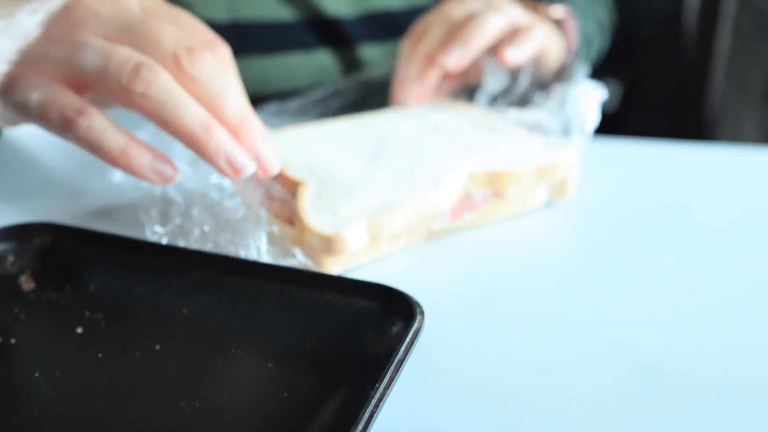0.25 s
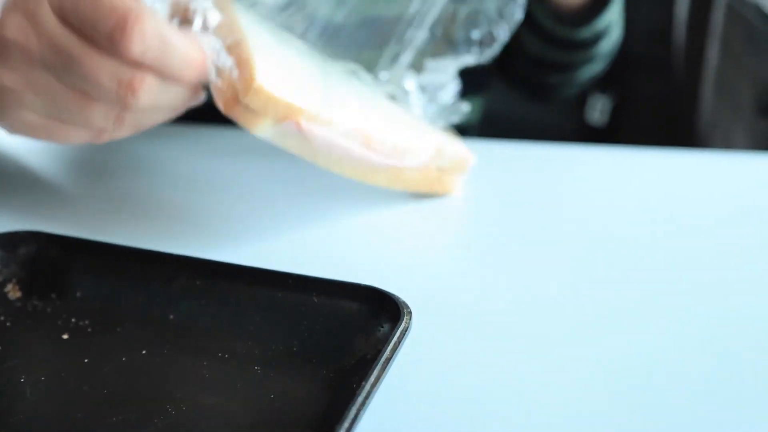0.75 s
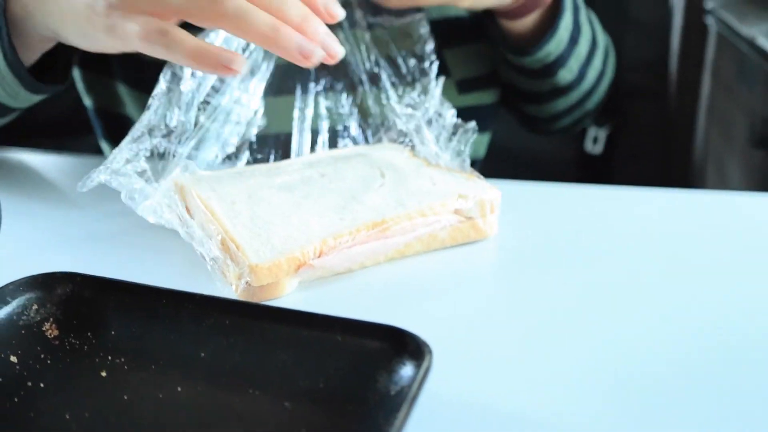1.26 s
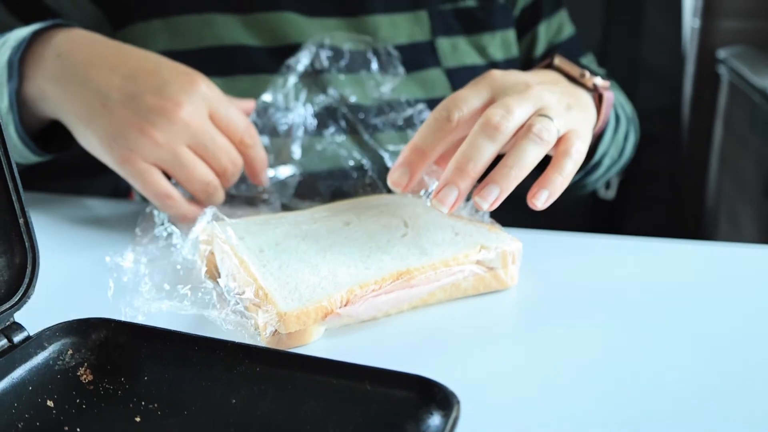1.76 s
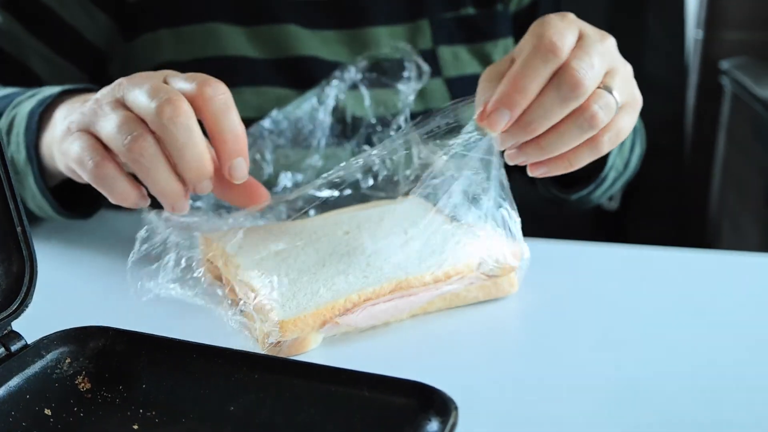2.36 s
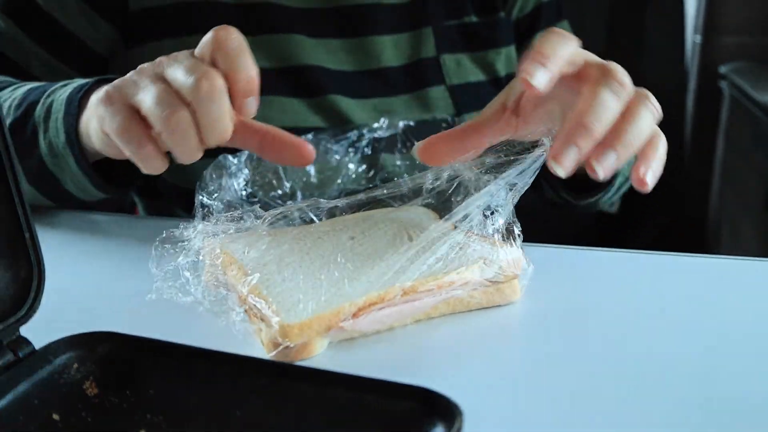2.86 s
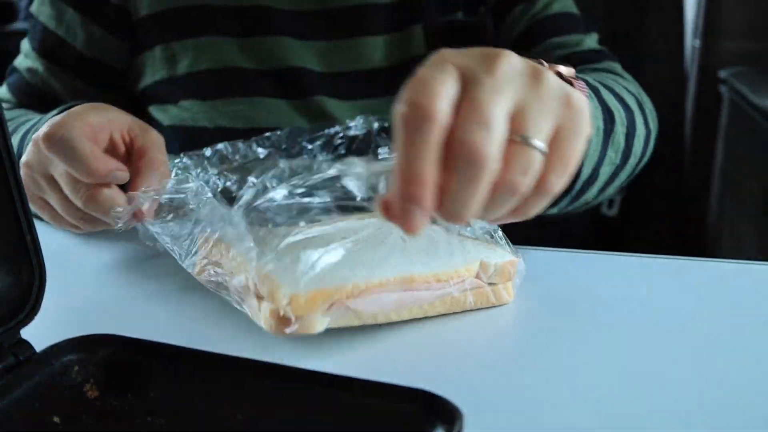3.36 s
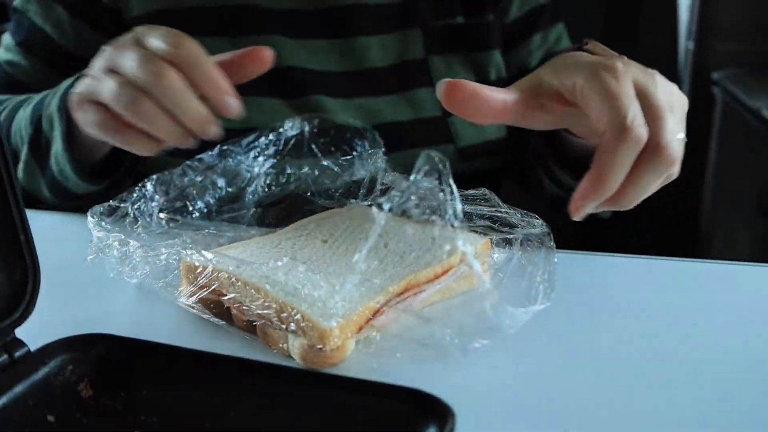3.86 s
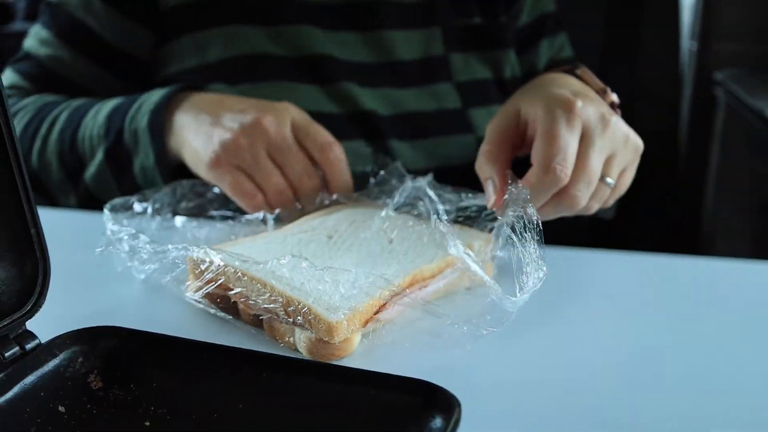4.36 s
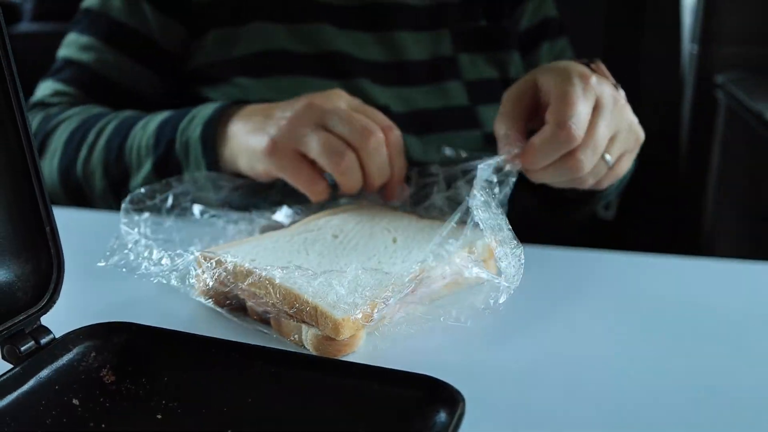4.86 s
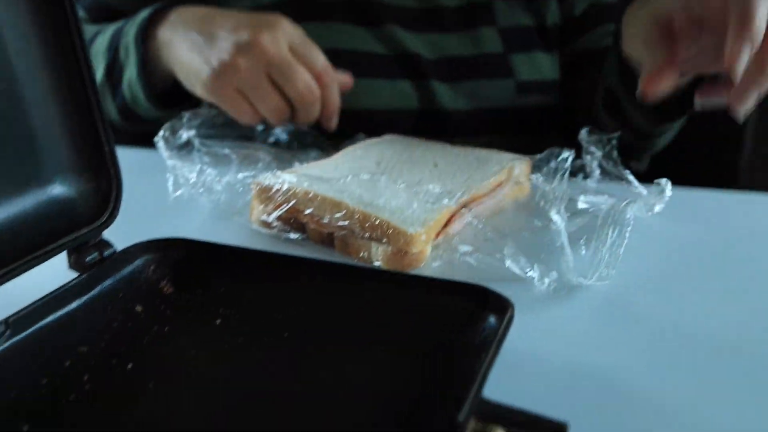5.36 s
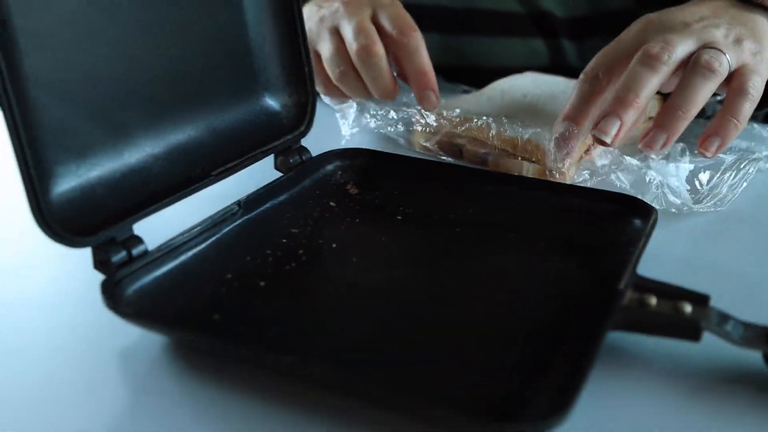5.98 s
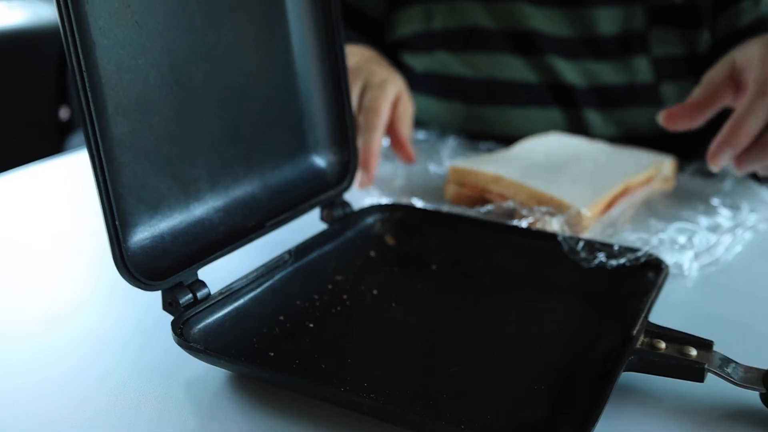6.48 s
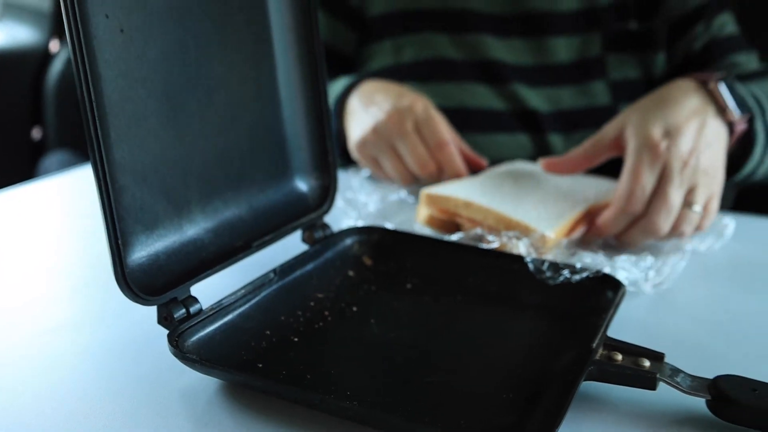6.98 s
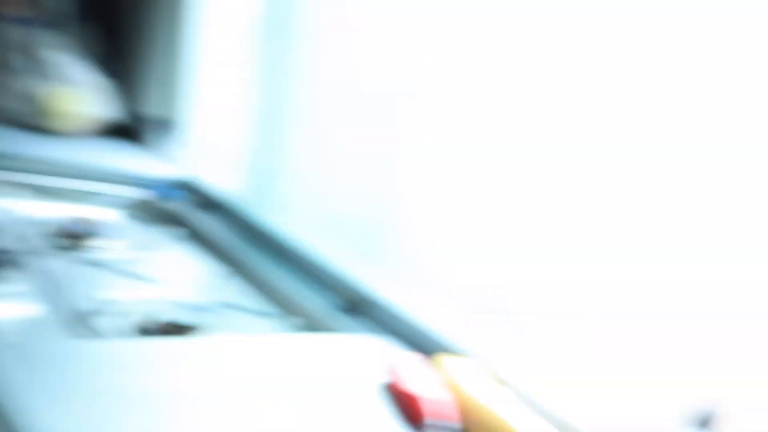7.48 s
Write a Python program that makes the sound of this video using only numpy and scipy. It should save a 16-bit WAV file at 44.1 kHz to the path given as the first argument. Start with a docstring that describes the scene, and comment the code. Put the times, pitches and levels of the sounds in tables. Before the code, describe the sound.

Over the soft, steady whir of an appliance in a small kitchen, plastic wrap rustles and pops close by as someone unwraps a sandwich. A loud knock on the table and a soft slap come first, then fitful crinkling builds to a sharp snap. Near the end a sandwich toaster takes a clunk and scrapes briefly, followed by a bump on the microphone, low handling rumble and a small clink.

```python
"""Unwrapping a sandwich

Cling film peels off a sandwich on a kitchen table, close to a hand-held camera in a small room.
It slips in tiny stick-slip bursts, creases buckle and pop, and a stretched corner snaps free.
Hands knock the table and nudge a sandwich toaster, which rings in its damped modes and skids.
An appliance whirs behind; at the end the camera is picked up and swung away."""
import sys
import numpy as np
from scipy import signal
from scipy.fft import rfft, irfft
from scipy.io import wavfile

SR = 44100
rng = np.random.default_rng(int(sys.argv[2]) if len(sys.argv) > 2 else 0)


def wav_record(signal):
    """Record a signal, one row per channel, as 16-bit PCM in the file named by sys.argv[1]."""
    frames = np.transpose(np.atleast_2d(signal))
    bounded = np.clip(frames, -1, 1)
    # unit amplitude maps onto the largest positive 16-bit level
    quanta = np.round(bounded * 32767).astype(np.int16)
    wavfile.write(sys.argv[1], SR, quanta)


N = 340628
T = np.arange(N) / SR
RING_T = T[:SR // 3]


def amp(db):
    """Amplitude ratio: tenfold for every 20 dB."""
    return 10 ** (np.asarray(db) / 20)


def unit(x):
    """Normalisation to rms 1."""
    return x / np.sqrt(np.mean(x ** 2))


def peaked(x, db):
    """Normalisation to a given peak level."""
    return x * amp(db) / np.abs(x).max()


def curve(rows, column):
    """Linear interpolation of one column over time."""
    rows = np.array(rows)
    return np.interp(T, rows[:, 0], rows[:, column])


def during(rows):
    """A rectangular gate, open from the first row to the last."""
    return (T >= rows[0][0]) & (T <= rows[-1][0])


def add(track, start_s, sound):
    """Superposition: a sound adds to the track from its start time."""
    start = int(start_s * SR)
    track[start:start + len(sound)] += sound[:N - start]


def response(spectrum, size=16384):
    """Minimum-phase impulse response of a (Hz, dB) spectrum, by folding the cepstrum."""
    hz, db = np.transpose(spectrum)
    bins_hz = np.maximum(np.arange(size // 2 + 1) * SR / size, 1)
    magnitude = amp(np.interp(np.log(bins_hz), np.log(hz), db))
    cepstrum = irfft(np.log(magnitude))
    cepstrum[1:size // 2] *= 2
    cepstrum[size // 2 + 1:] = 0
    return irfft(np.exp(rfft(cepstrum)))


def through(x, impulse):
    """Convolution with a response of unit energy."""
    return signal.fftconvolve(x, impulse / np.linalg.norm(impulse))[:N]


def band(x, hz, width_hz):
    """A second-order resonance, gain 1 at its centre."""
    hz = min(hz, SR / 3)
    quality = hz / min(width_hz, SR / 3)
    return signal.lfilter(*signal.iirpeak(hz, quality, fs=SR), x)


def soften(x, hz):
    """A first-order low-pass dulls the treble."""
    pole = np.exp(-2 * np.pi * hz / SR)
    return signal.lfilter([1 - pole], [1, -pole], x)


def walk(rate):
    """Random modulation of rms 1, with about rate turns a second."""
    return unit(np.interp(T * rate, np.arange(N // 4), rng.standard_normal(N // 4)))


def gesture(start, length, attack_s, release_db_per_s):
    """Envelope of a hand movement: linear attack, hold, exponential release."""
    attack = np.clip((T - start) / attack_s, 0, 1)
    return attack * amp(-release_db_per_s * np.maximum(T - start - length, 0))


# Spectrum of the moving air. Each row: frequency in Hz, relative level in dB.
AIR_SPECTRUM = [(30, -7.5), (80, 3), (160, 2), (280, -5.5), (700, -4.5), (1050, -6.5), (1500, -6.5),
                (2200, -12), (3000, -17), (5000, -20), (9000, -23), (15500, -29.5)]
# Its resonances. Each row: centre in Hz, nominal width in Hz, rms level in dB.
WHISTLES = [(1180, 33, -66), (1735, 157, -46.5), (3900, 220, -62.5), (9500, 300, -67)]


def appliance(air_db=-44):
    """Steady airflow makes broadband noise; resonances pick out narrow whistling bands."""
    air = through(rng.standard_normal(N), response(AIR_SPECTRUM)) * amp(air_db + .5 * walk(5))
    for hz, width_hz, db in WHISTLES:
        whistle = rng.standard_normal(N)
        for _ in range(2):
            whistle = band(whistle, hz, width_hz * 2.2)
        air += unit(whistle) * amp(db + 0.22 * walk(8.4))
    return air


# Spectrum of the camera's rumble. Each row: frequency in Hz, relative level in dB.
RUMBLE_SPECTRUM = [(8, -9.5), (16, 2), (30, -15.5), (60, -14.5), (120, -29), (300, -32.5), (1000, -84)]
# Moves of the camera. Each row: start in seconds, length in seconds, level in dB.
MOVES = [(0.287, 0.59, -33.5), (5.097, 0.25, -36.5), (5.655, 0.26, -39.5), (7.136, 0.11, -27),
         (7.431, 0.083, -29.5), (7.674, 0.07, -23.5)]


def handling(held_db=-45.5, sway_db=1.5):
    """Structure-borne noise: the camera rumbles faintly in the hand, and more with each move."""
    gain = amp(held_db + sway_db * walk(3.07))
    for start, length, db in MOVES:
        move = amp(db) * gesture(start, length, attack_s=0.028, release_db_per_s=57)
        gain = np.maximum(gain, move)
    return through(rng.standard_normal(N), response(RUMBLE_SPECTRUM)) * gain


# Rustles: the film as it is pulled and, in the last row, faint handling as the camera is swung away.
# Each row: start in seconds, length in seconds, final level in dB, growth in dB.
RUSTLES = [(0, 0.067, -47, -1.5), (0.204, 0.22, -42, 7), (0.364, 0.075, -33.5, 6.5),
           (0.477, 0.061, -42.5, -4), (0.554, 0.26, -32.5, 0.5), (0.833, .11, -35, 1), (1, .1, -34.5, 5.5),
           (1.149, .23, -39, 1.5), (1.44, 0.3, -45.5, -0.5), (1.692, 0.15, -46.5, -6),
           (1.933, 0.068, -50.5, -2), (2.054, 0.02, -44.5, -7), (2.105, 0.072, -36, 12),
           (2.188, 0.26, -39, -5), (2.414, 0.026, -33, 1), (2.47, 0.16, -45.5, -4.5),
           (2.591, 0.072, -40.5, 1.5), (2.69, 0.096, -49, 2), (3.095, 0.24, -31, 20),
           (3.343, 0.13, -36.5, 2), (3.43, .12, -34, 0.5), (3.618, 0.049, -40, 0), (4.018, 0.2, -49.5, 0.5),
           (4.257, .16, -47, 5), (4.447, 0.37, -52, -1), (4.723, 0.091, -35.5, 14.5),
           (4.834, 0.3, -32.5, 3.5), (5.187, 0.11, -44.5, -2.5), (5.84, .45, -41.5, 7),
           (6.299, 0.062, -36.5, 2), (6.734, 0.19, -53.5, -6), (6.956, 0.11, -50, -1.5),
           (7.195, 0.23, -46, 8), (7.48, 0.25, -47, 6.5)]


def pull(grab_s=0.0069, creep_db=-7.5):
    """Loading and relaxation: the level in dB ramps along each rustle, drops, then creeps away."""
    gain = np.full(N, 1e-4)
    for start, length, end_db, growth_db in RUSTLES:
        to_go = np.clip(1 - (T - start) / length, 0, 1)
        held = gesture(start, length, grab_s, release_db_per_s=188)
        creep = amp(creep_db) * gesture(start, length, grab_s, release_db_per_s=69.5)
        envelope = amp(end_db - growth_db * to_go) * np.maximum(held, creep)
        gain = np.maximum(gain, envelope)
    return 20 * np.log10(gain)


def slips(rate, spread_db):
    """A Poisson process: about rate impulses a second, of unequal size, rms 1."""
    size = amp(spread_db * np.clip(rng.standard_normal(N), -2, 2))
    occurs = rng.random(N) < rate / SR
    return unit(occurs * rng.choice([-1, 1], N) * size)


def crackles(rate, spread_db, t60):
    """Crackling noise: each buckling fold starts an avalanche of slips that decays exponentially."""
    retained = np.exp(-np.log(1e6) / (t60 * SR))
    energy = signal.lfilter([1], [1, -retained], slips(rate, spread_db) ** 2 + 1e-12)
    return unit(np.sqrt(energy) * rng.standard_normal(N))


# Spectra of the slips and of the taut sheet they shake. Each row: frequency in Hz, relative level in dB.
SLIP_SPECTRUM = [(300, -7.5), (1200, -1.5), (2500, 1), (4500, -0.5), (6500, -1.5), (9000, -1),
                 (12000, -5.5), (15500, -12.5)]
SHEET_SPECTRUM = [(80, -2.5), (160, 1.5), (260, -5.5), (500, 0.5), (900, -0.5), (1300, -5.5), (1700, -3),
                  (3000, -10), (8000, -36)]


def film(pull_db, slack_below_db=-42, slack_span_db=18):
    """Stick-slip peeling: the front catches and runs in spurts, slips fuse into hiss, folds tick."""
    # slack film stirs in fits, ticks more and sounds thinner
    slack = np.clip((slack_below_db - pull_db) / slack_span_db, 0, 1)
    spurts = amp(0.72 * walk(70) + (0.83 + 0.85 * slack) * walk(30))
    hiss = crackles(rate=2500, spread_db=-1, t60=0.016) * spurts
    # facets of different sizes tick at different pitches
    facets = sum(band(crackles(rate=45, spread_db=6, t60=0.006), hz, hz * 0.49)
                 for hz in (2200, 3980, 6540, 11200))
    ticks = amp(-11 + 0.5 * slack) * unit(facets) * spurts
    fine_slips = band(crackles(rate=900, spread_db=-3, t60=0.0047), hz=9300, width_hz=7000)
    thin_hiss = amp(-9.5) * slack * fine_slips * spurts
    rustle = through(hiss + thin_hiss + ticks, response(SLIP_SPECTRUM))
    # the harder the pull, the more the sheet sounds like a drumskin
    sheet = through(hiss, response(SHEET_SPECTRUM)) * amp(-6.0 + 0.052 * (pull_db + 29))
    return (amp(1.66) * rustle + sheet) * amp(pull_db)


def ring(modes):
    """Free vibration in damped modes; a panel radiates little below its lowest mode."""
    motion = sum(amp(db - 60 * RING_T / t60) * np.sin(2 * np.pi * hz * RING_T) for hz, db, t60 in modes)
    radiation = signal.butter(4, .85 * modes[0][0], "high", fs=SR, output="sos")
    return signal.sosfilt(radiation, motion)


def crack(spectrum, t60, scatter):
    """Source and filter: an impulse and a scatter of smaller ones take on the object's spectrum."""
    burst = scatter * rng.standard_normal(len(RING_T)) * amp(-60 * RING_T / t60)
    burst[0] += 1
    # bending waves disperse: the lows arrive just after the highs
    burst = signal.lfilter([-.5, 1], [1, -.5], burst)
    return signal.fftconvolve(burst, response(spectrum))[:len(RING_T)]


# Spectrum of a contact click. Each row: frequency in Hz, relative level in dB.
CLICK_SPECTRUM = [(200, -1.5), (600, 2.5), (1300, 6), (2000, -1), (2600, -1.5), (3500, -4), (4600, -1),
                  (6500, -6), (9000, -13.5), (15000, -23)]


def blows(events, modes):
    """Impact excitation: each blow clicks at the contact and sets the struck body ringing."""
    out = np.zeros(N)
    for start, ring_db, click_db in events:
        add(out, start, peaked(ring(modes), ring_db))
        click = crack(CLICK_SPECTRUM, t60=0.053, scatter=0.14)
        add(out, start, -peaked(click, click_db))
    return out


# Blows on the table; the row at 5.274 s is the sandwich settling onto it. Each row: start in seconds, ring peak
# in dB, click peak in dB.
TABLE_KNOCKS = [(.2992, 0.5, -7), (.3083, -30, -14), (5.274, -24.5, -44), (6.8758, -20.5, -20),
                (7.700, -31, -37)]
# Modes of the table. Each row: frequency in Hz, relative level in dB, 60 dB decay time in seconds.
TABLE_MODES = [(95, -12, 0.12), (170, -19, .08), (219, 0, 0.1), (329, -5, 0.13), (446, 6.5, 0.034),
               (644, -10, 0.076), (740, 10, 0.023), (930, -5, 0.07), (1050, -4, 0.085), (1546, -16, 0.14),
               (1713, -12, 0.082), (2276, -5, 0.026)]


def knocks():
    """A struck plate: the table rings in its modes when a hand knocks it or the sandwich settles on it."""
    return blows(TABLE_KNOCKS, TABLE_MODES)


# The main creases. Each row: start in seconds, nominal level in dB, centre frequency in Hz.
MAIN_CREASES = [(0.373, -20, 5760), (.4095, -12, 4260), (.4544, -25, 6530), (0.5692, -14.5, 9130),
                (.632, -10.5, 8950), (1.2077, -18.5, 8160), (1.3361, -18, 4220), (1.703, -21, 5000),
                (2.073, -21, 4180), (2.425, -20, 5500), (2.593, -20, 5120), (3.2042, -20, 3740),
                (3.2979, -17, 5560), (3.4417, -17, 7650), (4.885, -13, 4680), (4.9757, -16, 5660),
                (5.8426, -27, 9500), (7.4016, -24, 7530)]


def creases(pull_db, pops_per_s=9, over_pull_db=12, spread_db=4, centre_hz=5500):
    """Buckling: a crease gives way in a brief dense burst; the louder it is, the longer it lasts."""
    out = np.zeros(N)
    # lesser creases pop by chance, at levels that follow the pull
    moments = np.flatnonzero(rng.random(N) < pops_per_s / SR)
    chance = np.clip(rng.standard_normal((len(moments), 2)), -2, 2)
    lesser = [(T[i], pull_db[i] + over_pull_db + spread_db * size, centre_hz * 2 ** octaves)
              for i, (size, octaves) in zip(moments, chance)]
    for start, db, hz in MAIN_CREASES + lesser:
        pop = crack(SLIP_SPECTRUM, t60=0.02 * amp(0.16 * (db + 23)), scatter=0.24)
        add(out, start + .001, peaked(band(pop, hz, hz * 0.74), db - 3))
    return out


# The sandwich lands. Each row: start in seconds, ring peak in dB, click peak in dB.
SANDWICH_FLOPS = [(.785, -23, -18), (.7925, -9, -18), (.803, -32, -36)]
# Modes of the slap. Each row: frequency in Hz, relative level in dB, 60 dB decay time in seconds.
SLAP_MODES = [(98.5, 5.5, 0.038), (175, -0.5, 0.043), (620, 2, 0.049), (660, -1, 0.024), (885, -3, 0.031)]


def flop():
    """A soft impact: the sandwich slaps the table, exciting low, heavily damped modes."""
    return blows(SANDWICH_FLOPS, SLAP_MODES)


# Course of the squeak. Each row: time in seconds, pitch in Hz, level in dB.
SQUEAK_COURSE = [(3.62, 1448, -65), (3.66, 1560, -39), (3.71, 1494, -44), (3.77, 1530, -52)]


def squeak(jitter=0.099):
    """Friction oscillation: a finger sticks and slips on taut film, giving a rough tone and octave."""
    pitch_hz = curve(SQUEAK_COURSE, column=1) * (1 + jitter * walk(600))
    phase = 2 * np.pi * np.cumsum(pitch_hz) / SR
    tone = unit(np.sin(phase) + amp(-6) * np.sin(2 * phase))
    return tone * amp(curve(SQUEAK_COURSE, column=2)) * during(SQUEAK_COURSE)


# The corner lets go. Each row: start in seconds, peak in dB, low-pass cutoff in Hz.
CORNER_SNAPS = [(5.079, -14.5, 1500), (5.1481, 2.5, 9000), (5.156, 1, 3000)]
# Spectrum of a snap. Each row: frequency in Hz, relative level in dB.
SNAP_SPECTRUM = [(100, -6), (300, -4.5), (900, 4.5), (1900, -4), (2600, 2.5), (5000, 0.5), (10000, -4),
                 (15500, -16)]


def snaps():
    """Sudden release of elastic energy: the stretched corner cracks like a small whip."""
    out = np.zeros(N)
    for start, db, cutoff_hz in CORNER_SNAPS:
        whip = crack(SNAP_SPECTRUM, t60=0.016, scatter=0.12)
        add(out, start, -peaked(soften(whip, cutoff_hz), db))
    return out


# Bumps on the toaster. Each row: start in seconds, ring peak in dB, click peak in dB.
TOASTER_NUDGES = [(6.278, -19, -22), (6.2928, 0.5, -1.5)]
# Modes of the toaster. Each row: frequency in Hz, relative level in dB, 60 dB decay time in seconds.
TOASTER_MODES = [(230, -11.5, 0.18), (398, -10, 0.077), (448, 2, 0.042), (598, -3.5, 0.052),
                 (706, 0, 0.025), (800, -1, 0.023), (1300, 1.5, 0.026), (1470, -13, 0.031),
                 (1790, 1, 0.026), (2820, -5, 0.018), (3500, -5.5, 0.024)]


def nudge():
    """Modal ringing: the toaster's body vibrates freely after a hand bumps it."""
    return blows(TOASTER_NUDGES, TOASTER_MODES)


# Course of the skid. Each row: time in seconds, body level in dB, grit level in dB.
SKID_COURSE = [(6.3, -44, -42), (6.316, -26.5, -37), (6.34, -33, -35.5), (6.365, -27.5, -33),
               (6.386, -39, -32), (6.392, -70, -60)]


def skid():
    """Stick-slip friction: the toaster's feet shake its body, then scratch as it comes to rest."""
    feet = slips(rate=2000, spread_db=5.5) * during(SKID_COURSE)
    body = through(feet * amp(curve(SKID_COURSE, column=1)), ring(TOASTER_MODES))
    scratch = band(response(CLICK_SPECTRUM), hz=2000, width_hz=2200)
    grit = through(feet * amp(curve(SKID_COURSE, column=2)), scratch)
    return body + grit


# The camera is gripped. Each row: start in seconds, ring peak in dB, click peak in dB.
CAMERA_GRIPS = [(7.1655, -22, -13), (7.181, -14.5, -5.5), (7.265, -29.5, -40)]
# Modes of its mount. Each row: frequency in Hz, relative level in dB, 60 dB decay time in seconds.
MOUNT_MODES = [(67, 1, 0.13), (207, -7, 0.15), (328, 2.5, 0.025), (396, -11, 0.041), (617, -11, 0.048),
               (1130, -6, 0.027), (1480, -16, 0.029)]


def grip():
    """Structure-borne impact: gripping the camera excites the modes of its mount."""
    return blows(CAMERA_GRIPS, MOUNT_MODES)


# Contacts as the camera swings. Each row: start in seconds, ring peak in dB.
CLINK_CONTACTS = [(7.459, -31), (7.4628, -16.5), (7.466, -16.5)]
# Modes of the object. Each row: frequency in Hz, relative level in dB, 60 dB decay time in seconds.
CLINK_MODES = [(976, -9, .04), (1230, -1, 0.035), (1750, -10, .035), (2394, 2, 0.032), (2570, 1, 0.033),
               (3430, -9, .04), (4020, -13, .06), (4400, -2, .07), (4560, 4, 0.09), (4880, -3, .04),
               (5900, 0.5, 0.051), (6500, -7, 0.032), (7730, 4.5, .03)]


def clink():
    """Quick grazing impacts excite the high modes of one small hard object."""
    out = np.zeros(N)
    for start, db in CLINK_CONTACTS:
        add(out, start, peaked(ring(CLINK_MODES), db))
        graze = crack(CLICK_SPECTRUM, t60=0.03, scatter=0.67)
        add(out, start, peaked(band(graze, hz=5200, width_hz=12600), db - 0.5))
    return out


def room(x, t60, wet_db, dull_hz):
    """Reverberation: reflections from the table and near walls merge into an exponential tail."""
    reflections = soften(rng.standard_normal(len(RING_T)), dull_hz)
    tail = reflections * amp(-60 * RING_T / t60) * (RING_T > .003)
    return x + amp(wet_db) * through(x, tail)


def scene():
    """Superposition in one small room, where the lows of the bumps linger longest."""
    bumps = room(knocks() + flop() + nudge() + grip(), t60=0.43, wet_db=-24.5, dull_hz=700)
    pull_db = pull()
    near = film(pull_db) + creases(pull_db) + snaps() + squeak() + bumps + skid() + clink()
    near = room(near, t60=0.087, wet_db=-16.0, dull_hz=7040)
    return (near + appliance() + handling())[None]


def record(dry, top_hz=15900):
    """Saturation and band limiting: the recorder rounds the loudest peaks and cuts the top."""
    rounded = dry / (1 + dry ** 8) ** (1 / 8)
    low_pass = signal.ellip(10, .2, 80, top_hz, fs=SR, output="sos")
    return signal.sosfilt(low_pass, rounded)


dry = scene()
out = record(dry)
wav_record(out)
```